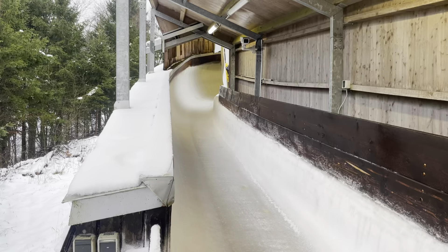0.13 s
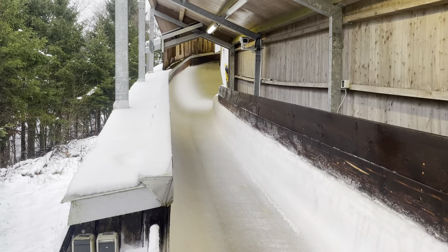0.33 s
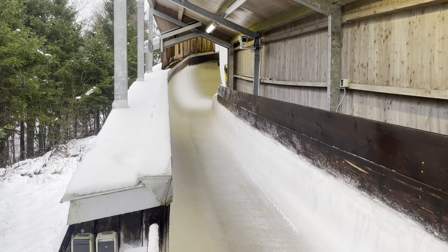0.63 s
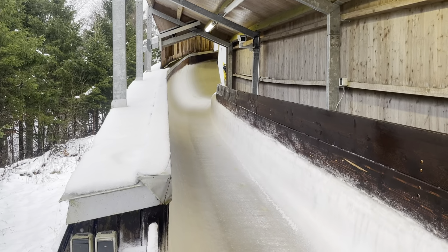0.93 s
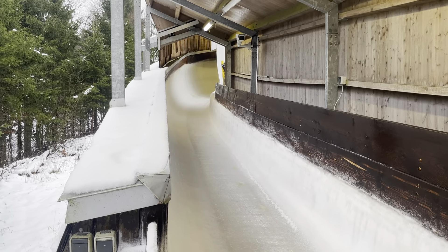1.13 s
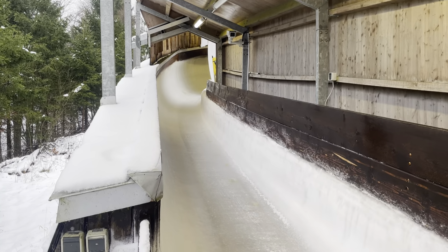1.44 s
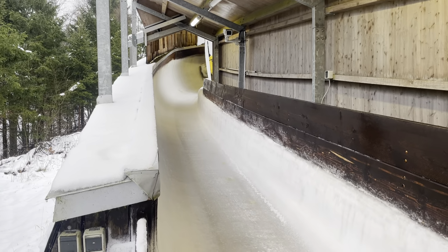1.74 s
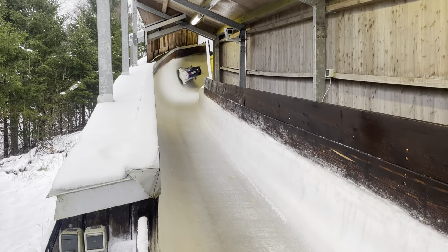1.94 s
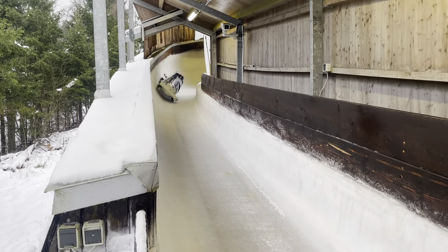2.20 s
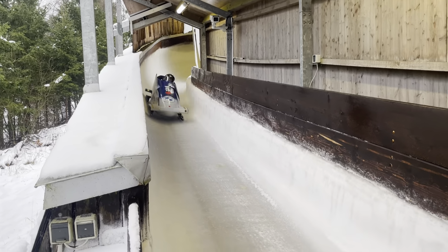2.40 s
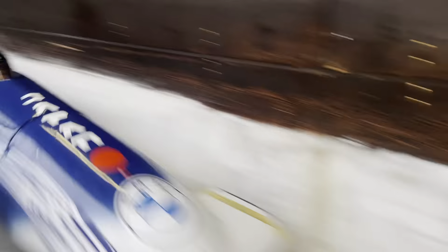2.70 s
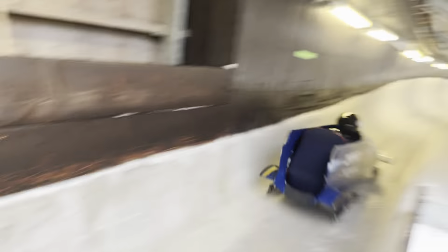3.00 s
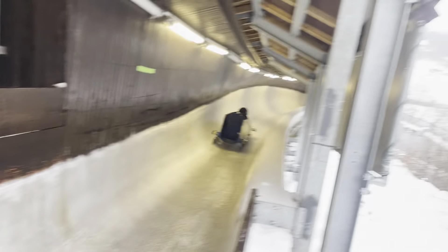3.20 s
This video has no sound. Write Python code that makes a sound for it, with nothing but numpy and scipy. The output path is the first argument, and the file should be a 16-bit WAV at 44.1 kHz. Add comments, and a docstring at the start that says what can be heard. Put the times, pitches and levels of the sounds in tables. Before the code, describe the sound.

A bobsled approaches on a roofed ice track. From 0.1 s a strong, uneven low rumble carries heavy thumps, hollow panel knocks and faint rattles. From about 1.8 s gritty runner scraping, cracking ice and steel taps grow, brightening toward 2.5 s. It clatters past close at 2.5-2.9 s, leaning slightly right, with a sharp steel clink near 2.8 s. After 3 s it falls away, duller, still rumbling and scraping until 3.35 s.

```python
"""A roofed ice track: a bobsled comes down, passes close by and runs on into the next bend.
Coloured noise makes the rumble of the track and the boom of the hull; bursts pulsed by small bumps
make the runners glide and scrape. Coarse ice cracks in pitched clicks, the chassis knocks in noise
bursts, and bumps, panels, fittings and a steel clink ring. Ice chips tick.
A dense noise tail is the reflection from the wooden roof."""
import sys
import numpy as np
from scipy import signal
from scipy.fft import rfft, irfft, next_fast_len
from scipy.io import wavfile
from scipy.ndimage import uniform_filter1d

SR = 44100
rng = np.random.default_rng(int(sys.argv[2]) if len(sys.argv) > 2 else 0)


def log_audio(samples):
    """Write samples as a 16-bit WAV file to the path given in sys.argv[1]."""
    # one column per channel
    frames = np.atleast_2d(samples).T
    # limit to full scale, then quantise
    limited = np.clip(frames, -1, 1)
    pcm = np.round(limited * 32767).astype(np.int16)
    wavfile.write(sys.argv[1], SR, pcm)


N = 147735
T = np.arange(N) / SR
SIZE = 2 * next_fast_len(N // 2 + SR // 4)   # even FFT length with room for filter tails
HZ = np.arange(SIZE // 2 + 1) * SR / SIZE
SIDES = np.array([[1], [-1]])   # left, right

# spectrum of the shaken track: f/Hz, relative level/dB
RUMBLE_COLOUR = [(20, -39), (35, -31.5), (48, -27), (63, -4.5), (88, -1), (135, 0), (168, -19.5),
                 (260, -29), (600, -64.5), (4000, -140)]
# runner edges biting into the ice: t/s, relative level/dB
SCRAPE_LEVEL = [(.08, -35), (.17, -39), (.40, -42.5), (.44, -37), (.52, -33.5), (.67, -45.5), (.75, -40),
                (.95, -42.5), (1.07, -35), (1.12, -34.5), (1.24, -30), (1.38, -42), (1.46, -34.5),
                (1.56, -39.5), (1.78, -37.5), (1.82, -25), (2.01, -28), (2.06, -23.5), (2.17, -20.5),
                (2.26, -17.5), (2.32, -24), (2.38, -27), (2.47, -26), (2.50, -18), (2.56, -20.5),
                (2.60, -25.5), (2.65, -21), (2.69, -29), (2.73, -22.5), (2.79, -24.5), (2.87, -25.5),
                (3.01, -25.5), (3.09, -33), (3.2, -32.5), (3.35, -26)]


def rumble():
    """Uneven ice shakes track and hull; a deep push of air and track comes while the sled is near."""
    # loudness of the low track rumble, uneven from moment to moment: t/s, level/dB
    track_level = [(.1, -17), (.18, -13.5), (.23, -18), (.3, -19), (.4, -15.5), (.5, -14.5), (.62, -19.5),
                   (.8, -16), (1.05, -14.5), (1.14, -15.5), (1.25, -13), (1.33, -14), (1.6, -15.5),
                   (1.72, -17), (1.9, -14), (2.02, -14.5), (2.12, -15), (2.24, -13.5), (2.33, -14),
                   (2.5, -9.5), (2.62, -14), (2.95, -13.5), (3.04, -22), (3.13, -27), (3.22, -18),
                   (3.35, -23.5)]
    # shaking of the hull: t/s, level/dB
    boom_level = [(.1, -28), (.2, -28), (.34, -27.5), (.45, -21.5), (.56, -20), (.72, -26), (.78, -21),
                  (.86, -25), (1.05, -22), (1.19, -22), (1.27, -25), (1.55, -23), (1.8, -23.5),
                  (1.92, -20.5), (2.1, -17.5), (2.24, -18.5), (2.38, -19), (2.54, -20.5), (2.66, -18),
                  (2.8, -16), (2.96, -15), (3.03, -23.5), (3.13, -27.5), (3.29, -19), (3.35, -21)]
    # hull spectrum: f/Hz, relative level/dB
    boom_colour = [(80, -33), (155, -5), (198, 4.5), (228, -1.5), (310, 1), (372, -6.5), (450, -10.5),
                   (540, -17.5), (1200, -54), (8000, -110)]
    # deep push: t/s, level/dB
    thrust_level = [(1.95, -63), (2.08, -22), (2.35, -35), (2.52, -25), (2.82, -26.5), (3.0, -43),
                    (3.35, -41)]
    # spectrum of the push: f/Hz, relative level/dB
    thrust_colour = [(15, -17), (28, 0), (45, 21), (65, 16), (120, -40), (2000, -120)]
    track = steadied(colour(noise(), RUMBLE_COLOUR), seconds=0.13) * level(track_level)
    hull = steadied(colour(noise(), boom_colour), seconds=0.035) * level(boom_level)
    thrust = colour(noise(), thrust_colour) * level(thrust_level)
    return track + hull + thrust


def runners():
    """Friction and crushed ice give a dull glide and a bright scrape, both pulsing with the bumps."""
    # runners gliding, louder as the sled nears: t/s, relative level/dB
    glide_level = [(.1, -31), (.38, -39.5), (.49, -29.5), (.66, -38.5), (.8, -33.5), (.9, -34.5),
                   (1.2, -30), (1.38, -31), (1.72, -32), (1.87, -26.5), (2.0, -27.5), (2.2, -18),
                   (2.34, -23.5), (2.45, -26), (2.56, -15), (2.6, -20), (2.65, -20.5), (2.68, -20),
                   (2.71, -20), (2.77, -19), (2.88, -23), (3.0, -22.5), (3.14, -32.5), (3.27, -24.5),
                   (3.35, -28.5)]
    # glide spectrum: f/Hz, relative level/dB
    glide_colour = [(150, -27.5), (400, 5.5), (550, 4.5), (800, 3), (1250, 0), (1550, -7.5), (2300, -21),
                    (4000, -26), (9000, -46), (15000, -68)]
    # scrape spectrum: f/Hz, relative level/dB
    scrape_colour = [(500, -18.5), (1300, -2.5), (2100, 3), (3300, -0.5), (4600, -0.5), (5700, -5.5),
                     (6600, -6.5), (7800, -6), (10500, -16), (12500, -26.5), (15000, -63)]
    glide_db, scrape_db = -1, -1.5
    pressure = chatter()
    glide = colour(crunch(grit=0.22) * pressure * level(glide_level), glide_colour)
    biting = crunch(grit=0.25) * pressure * level(SCRAPE_LEVEL)
    scrape = colour(frame(biting), scrape_colour)
    return from_db(glide_db) * glide + from_db(scrape_db) * scrape


def chatter():
    """Pressure on the runners: each small bump makes it jump up and die away."""
    jolts_per_s, decay_s, depth = 60, 0.0067, 0.92
    jolts = (rng.random(N) < jolts_per_s / SR) * rng.uniform(0.15, 0.93, N)
    decaying = signal.lfilter([1], [1, -np.exp(-1 / (decay_s * SR))], jolts)
    return rms_one(1 + depth * decaying)


def crunch(grit):
    """Tiny fractures of uneven size mixed with smooth friction; grit is the power share of fractures."""
    chips_per_s, spread_db = 2500, 2.5
    grit = np.clip(grit, 0, 1)
    sizes = from_db(spread_db * np.minimum(rng.exponential(1, N), 5))
    chips = (rng.random(N) < chips_per_s / SR) * sizes * noise()
    return np.sqrt(grit) * rms_one(chips) + np.sqrt(1 - grit) * noise()


def frame(x):
    """Narrow resonances of the steel, added to whatever shakes it."""
    # resonances of runners and frame: f/Hz, bandwidth/Hz, gain (linear)
    resonances = [(1900, 12, 0.12), (3280, 47, 0.36), (3350, 42, 0.46), (3910, 160, 0.37), (4230, 13, 0.27),
                  (4800, 42, 0.37), (5550, 30, 0.51), (6560, 17, 0.27), (6950, 24, 0.45), (11100, 40, 0.57)]
    out = x
    for hz, width_hz, gain in resonances:
        r = np.exp(-np.pi * width_hz / SR)
        zeros = np.array([1, 0, -1]) * (1 - r * r) / 2
        poles = [1, -2 * r * np.cos(2 * np.pi * hz / SR), r * r]
        out = out + gain * signal.lfilter(zeros, poles, x)
    return out


def shards():
    """Coarse grains of ice crack under the edges, each with its own pitch, as strong as the edges bite."""
    shards_per_s, spread_db, t60_cycles, shards_db = 420, 3, 45, -6.5
    pitches_hz = np.geomspace(1100, 5490, 24)
    sizes = from_db(spread_db * np.minimum(rng.exponential(1, N), 3)) * rng.choice([-1, 1], (2, N))
    clicks = (rng.random(N) < shards_per_s / SR) * sizes
    dealt = rng.integers(0, len(pitches_hz), N)
    out = 0
    for k, hz in enumerate(pitches_hz):
        r = from_db(-60 * hz / (t60_cycles * SR))
        poles = [1, -2 * r * np.cos(2 * np.pi * hz / SR), r * r]
        struck = clicks * (dealt == k) + 1e-18 * sizes   # inaudible floor avoids denormals
        out = out + signal.lfilter([1, 1, -1, -1], poles, struck)
    return rms_one(out) * level(SCRAPE_LEVEL) * from_db(shards_db)


def knocks():
    """Each chassis knock is a short, dying clatter of the frame and a dull thud of the hull."""
    # knocks: t/s, clatter level/dB, thud level/dB, swell/s, ring t60/s
    knock_rows = [(0.119, -26, -55, 0.0026, 0.056), (0.159, -28, -30, 0.0013, 0.1),
                  (0.271, -33.5, -38, 0.0018, 0.046), (0.423, -30.5, -43, 0.0026, 0.08),
                  (0.451, -26, -35, 0.0028, 0.089), (0.495, -28, -25, 0.0018, 0.12),
                  (0.712, -29.5, -29, 0.002, 0.11), (0.759, -31.5, -46, 0.0014, 0.11),
                  (1.044, -24.5, -44, 0.0038, 0.14), (1.123, -26.5, -35, 0.0022, 0.1),
                  (1.202, -23, -25, 0.0021, 0.058), (1.249, -32.5, -27, 0.0023, 0.17),
                  (1.429, -29, -34, .002, 0.045), (1.449, -28, -33, 0.0014, 0.06),
                  (1.684, -28.5, -40, 0.0017, 0.029), (1.796, -21, -34, 0.0022, 0.062),
                  (1.945, -19, -27, 0.0014, 0.054), (2.024, -20, -33, 0.0014, 0.14),
                  (2.05, -15, -24, 0.0044, 0.16), (2.114, -18.5, -30, 0.0021, 0.073),
                  (2.18, -28, -21, .004, 0.12), (2.487, -18, -16, 0.0026, 0.11),
                  (2.534, -18, -21.5, 0.0018, 0.14), (2.615, -21, -37, 0.0017, 0.3),
                  (2.631, -11, -11.5, 0.0063, 0.045), (2.709, -13, -22.5, 0.014, 0.12),
                  (2.815, -18.5, -27, .003, 0.16), (2.857, -40, -11.5, 0.002, 0.025),
                  (2.912, -22, -41, 0.0014, 0.11)]
    # clatter spectrum: f/Hz, relative level/dB
    clatter_colour = [(200, -2), (900, 1.5), (1900, -2), (2700, 2), (3500, 2), (4700, 1), (5800, -6.5),
                      (6700, -5.5), (8000, -6.5), (10500, -17.5), (12500, -29.5), (15000, -45)]
    # thud spectrum: f/Hz, relative level/dB
    thud_colour = [(60, -22), (150, -8), (450, 1.5), (1200, -1.5), (2500, -24), (12000, -63)]
    clatter, thud = np.zeros((2, N))
    for s, clatter_db, thud_db, swell_s, t60_s in knock_rows:
        age = T - s
        decay = from_db(-60 * np.maximum(age - swell_s, 0) / t60_s)
        force = decay * np.clip(age / swell_s, 0, 1)
        clatter += from_db(clatter_db) * force
        thud += from_db(thud_db) * force
    rattling_frame = colour(frame(crunch(grit=0.29) * clatter), clatter_colour)
    return rattling_frame + colour(noise() * thud, thud_colour)


def bumps():
    """Each heavy bump is one push that rings the track through the rumble filter."""
    # bumps: t/s, peak level/dB
    bump_rows = [(.268, -5), (.334, -10.5), (0.481, -3), (1.142, -1.5), (1.209, -6.5), (1.262, -2.5),
                 (1.451, -9.5), (2.081, -1), (2.189, -1.5), (2.249, -6.5), (2.498, -3), (2.925, -13),
                 (3.075, -15), (3.149, -11.5)]
    pushes = np.zeros(N)
    for s, db in bump_rows:
        pushes[int(s * SR)] = from_db(db)
    one_thump = colour(signal.unit_impulse(N), RUMBLE_COLOUR)
    return colour(pushes, RUMBLE_COLOUR) / np.abs(one_thump).max()


def panels():
    """A jolted hull panel swells and dies within tens of ms, a hollow knock at its own pitch."""
    # panel knocks: t/s, level/dB, f/Hz
    panel_rows = [(0.206, -13, 213.6), (0.399, -19, 354), (.492, -17.5, 388), (0.551, -18.5, 253),
                  (.992, -28, 412), (1.134, -17, 400), (1.195, -18, 220), (1.561, -23, 413),
                  (1.868, -7, 200), (2.037, -11, 200), (2.06, -20.5, 386), (2.19, -12.5, 352),
                  (2.25, -19.5, 441), (2.307, -23.5, 410), (2.371, -20, 340), (2.56, -15, 472),
                  (2.694, -15.5, 401), (2.768, -16, 450), (2.818, -10, 234), (2.857, -24, 805),
                  (2.882, -15.5, 451), (2.929, -18, 339), (2.972, -19, 255)]
    swell_s, overtone_ratio, overtone_db = 0.0078, 1.47, -14.5
    out = np.zeros(N)
    for s, db, hz in panel_rows:
        age = np.maximum(T - s, 0)
        phase = 2 * np.pi * hz * age
        swell = age / swell_s * np.exp(1 - age / swell_s)
        tone = np.sin(phase) + from_db(overtone_db) * np.sin(overtone_ratio * phase)
        out += from_db(db) * swell * tone
    return out


def rattles():
    """Loose steel fittings tap, bounce once and ring briefly, modes detuned at random for each tap."""
    # taps: t/s, relative level/dB, f/Hz
    tap_rows = [(.424, -26.5, 3310), (.438, -22, 4220), (.461, -25, 1900), (.479, -24, 4870),
                (0.497, -24, 4350), (.574, -27, 3900), (.712, -24, 3350), (.722, -22.5, 1100),
                (1.046, -17.5, 3400), (1.072, -25, 3670), (1.124, -18, 2410), (1.133, -18.5, 1290),
                (1.146, -27, 4420), (1.187, -24, 3870), (1.252, -24, 3080), (1.452, -24.5, 3490),
                (1.799, -13, 3450), (1.944, -11, 3440), (2.024, -10.5, 3260), (2.054, -17, 3430),
                (2.069, -15, 3900), (2.115, -15, 2540), (2.183, -16, 5200), (2.207, -14, 4770),
                (2.268, -20, 4130), (2.492, -12, 2650), (2.536, -12, 2290), (2.636, -16, 3070),
                (2.72, -20, 4800), (2.92, -20, 1130)]
    # modes of a fitting: frequency ratio, relative level/dB
    fitting_modes = [(0.731, -10), (1, -3), (1.088, -9), (1.46, -11)]
    t60_s, bounce_s, bounce_loss_db = .035, 0.012, 8.5
    out = np.zeros((2, N + SR))
    age = T[:SR // 10]
    for s, db, hz in tap_rows:
        for bounce in (0, 1):
            start = int((s + bounce * bounce_s * rng.uniform(.6, 1.4)) * SR)
            for ratio, mode_db in fitting_modes:
                mode_hz = hz * ratio * rng.uniform(.97, 1.03)
                phase = 2 * np.pi * (mode_hz * age + rng.random((2, 1)))
                ring = from_db(db + mode_db - bounce * bounce_loss_db - 60 * age / t60_s)
                out[:, start:start + len(age)] += ring * np.sin(phase)
    return out[:, :N]


def clink():
    """Steel strikes steel once, just after the pass, and its modes ring as decaying sines."""
    # modes: f/Hz, relative level/dB, t60/s
    steel_modes = [(6480, 2.5, 0.012), (6540, -5, 0.0097), (4380, -4, 0.019), (3920, -17, 0.023)]
    strike_s, strike_db, rise_s = 2.8203, -4.5, 0.0012
    age = np.maximum(T - strike_s, 0)
    rings = np.zeros(N)
    for hz, db, t60_s in steel_modes:
        rings += from_db(strike_db + db - 60 * age / t60_s) * np.sin(2 * np.pi * hz * age)
    mid_side = np.array([[1], [.4]])
    return rings * np.minimum(age / rise_s, 1) * mid_side


def ticks():
    """Flying ice chips tick against the wall: short, bright, faint noise bursts."""
    # ticks: t/s, relative onset level/dB
    tick_rows = [(1.683, -33), (1.814, -26.5), (1.858, -26.5), (2.068, -23), (2.136, -27), (2.415, -31),
                 (2.912, -36)]
    # tick spectrum: f/Hz, relative level/dB
    tick_colour = [(1500, -25), (4000, 2), (7000, 4), (11000, -0.5), (12500, -19), (15000, -26)]
    t60_s = 0.071
    force = np.zeros(N)
    for s, db in tick_rows:
        force += from_db(db - 60 * np.maximum(T - s, 0) / t60_s) * (T > s)
    return colour(noise() * force, tick_colour)


def bend(x):
    """The sled sounds duller until it comes out of the bend, and again as it leaves."""
    # treble change inside a bend: f/Hz, gain/dB
    dull_gain = [(2000, 0), (6000, -5), (10000, -7), (13000, 1.5)]
    emerge_s, emerge_width_s = 2.4, 0.39
    leave_s, leave_width_s = 3.1, 0.044
    emerged = np.tanh((T - emerge_s) / emerge_width_s)
    left_again = np.tanh((T - leave_s) / leave_width_s)
    seen = (emerged - left_again) / 2
    dull = irfft(rfft(x, SIZE) * from_db(at_hz(dull_gain)))[:, :N]
    return seen * x + (1 - seen) * dull


def spread(pair):
    """Mid and side signals become left and right, with width and balance set by frequency."""
    # unrelated part re. common part: f/Hz, level/dB
    side_level = [(60, -20.5), (120, -19.5), (250, -19), (380, -18.5), (520, -9), (740, -8.5), (1130, -12),
                  (1850, -5.5), (3000, -6), (4900, -8), (6500, -5), (7400, 5), (8250, 30.5), (9200, 2.5),
                  (11200, -18), (12500, -9), (14000, 10)]
    # left re. right: f/Hz, level/dB
    left_lean = [(60, -1), (260, 1.2), (430, -0.5), (700, 4), (1130, 2.5), (1850, 2.5), (3000, 7),
                 (4900, 6), (7000, -0.5), (13000, 0.5)]
    mid, side = rfft(pair, SIZE)
    width = from_db(at_hz(side_level))
    both = (mid + SIDES * width * side) / np.sqrt(1 + width ** 2)
    return irfft(both * from_db(SIDES * at_hz(left_lean) / 2))[:, :N]


def roof(x):
    """Dense reflections from roof and planks: convolution with a delayed, decaying noise tail."""
    delay_s, t60_s = 0.012, 0.31
    age = T[:SR] - delay_s
    tail = rng.standard_normal((2, SR)) * (age > 0) * from_db(-60 * age / t60_s)
    return signal.fftconvolve(x, rms_one(tail) / np.sqrt(SR), axes=-1)[:, :N]


def from_db(db):
    """Decibels to gain."""
    return 10 ** (np.asarray(db) / 20)


def rms_one(x):
    """Scale to unit power."""
    return x / np.sqrt(np.mean(x ** 2) + 1e-20)


def level(rows):
    """Gain over time from t/s, level/dB rows."""
    return from_db(np.interp(T, *np.transpose(rows)))


def at_hz(points):
    """A table read along log frequency."""
    hz, value = np.transpose(points)
    return np.interp(np.log(HZ + 1e-3), np.log(hz), value)


def colour(x, points):
    """Minimum-phase filter with the given spectrum; white noise keeps its power."""
    cepstrum = irfft(np.log(rms_one(from_db(at_hz(points)))))
    # folding the cepstrum onto positive times makes the filter causal
    fold = np.r_[1, np.full(SIZE // 2 - 1, 2), 1, np.zeros(SIZE // 2 - 1)]
    response = np.exp(rfft(cepstrum * fold))
    return irfft(rfft(x, SIZE) * response)[..., :N]


def noise():
    """Two unrelated white noises."""
    return rng.standard_normal((2, N))


def steadied(x, seconds):
    """Even out the slow swells of a noise by its running power."""
    power = uniform_filter1d(x ** 2, max(int(seconds * SR), 8), axis=-1)
    return x / np.sqrt(power + 1e-12)


def scene():
    """The sled under the roof swings to the right as it passes; the clink has no reflections."""
    pass_s, pass_width_s, pass_pan_db = 2.75, 0.19, -2.5   # negative pan: right
    roof_db, start_s, fade_in_s = -17, .083, 0.0015
    sled = bend(runners() + shards() + knocks() + rattles() + ticks())
    roofed = spread(sled + clink() + from_db(roof_db) * roof(sled))
    pan_db = pass_pan_db * np.exp(-((T - pass_s) / pass_width_s) ** 2)
    passing = roofed * from_db(pan_db * SIDES / 2)
    mix = passing + spread(rumble()) + bumps() + panels()
    return mix * np.clip((T - start_s) / fade_in_s, 0, 1)


def record(dry):
    """The highest peaks are rounded and the top is cut."""
    rounded = dry / (1 + (dry / .95) ** 6) ** (1 / 6)
    stop_hz = 15500
    low_pass = signal.cheby2(12, 50, stop_hz, fs=SR, output="sos")
    return signal.sosfiltfilt(low_pass, rounded)


dry = scene()
out = record(dry)
log_audio(out)
```